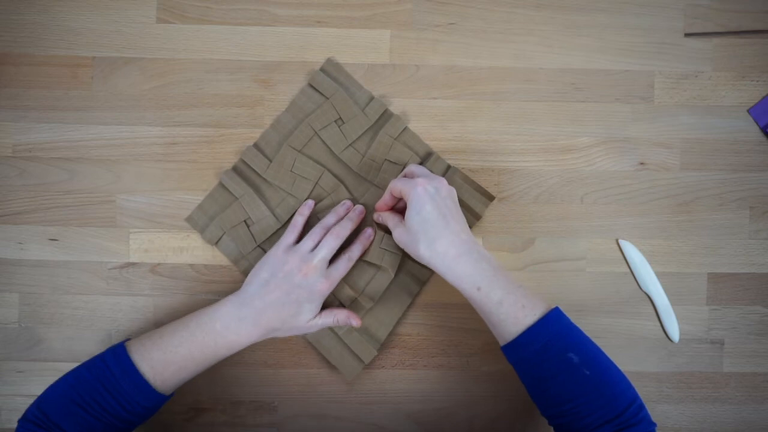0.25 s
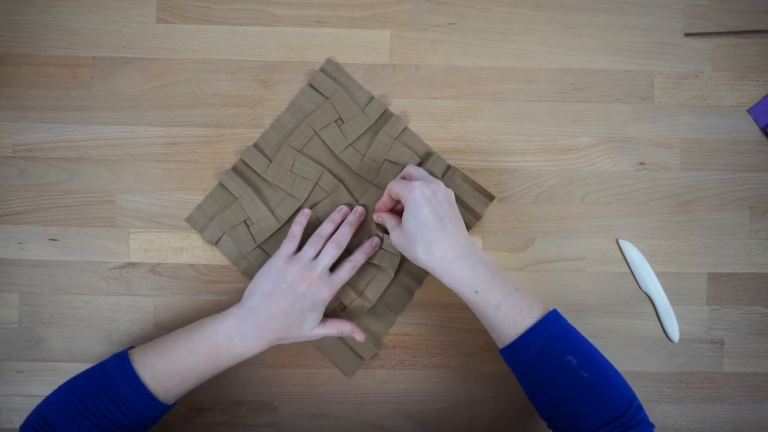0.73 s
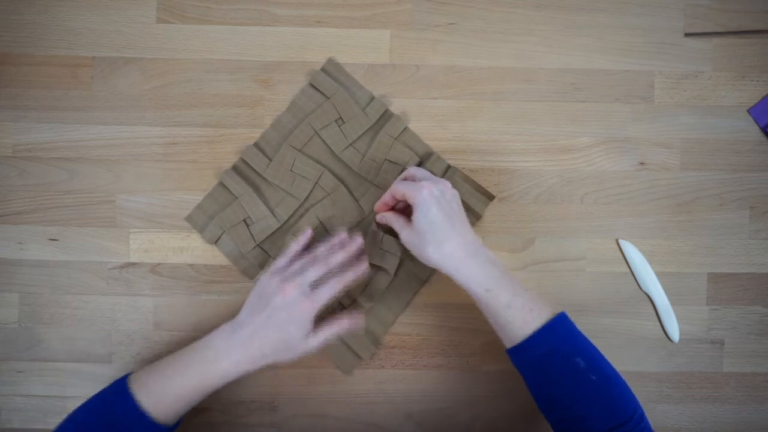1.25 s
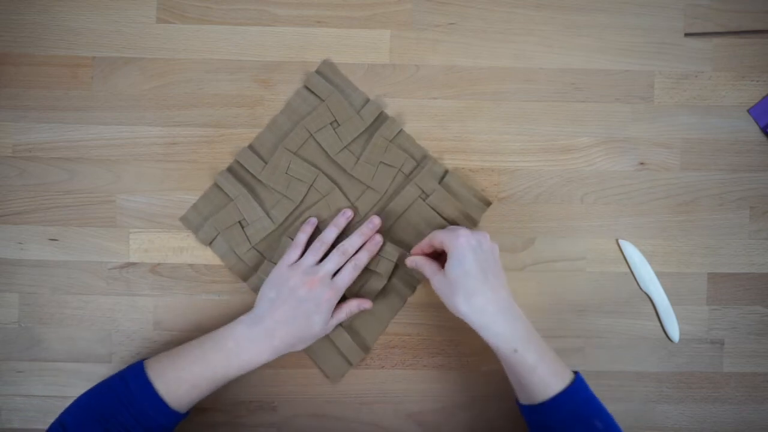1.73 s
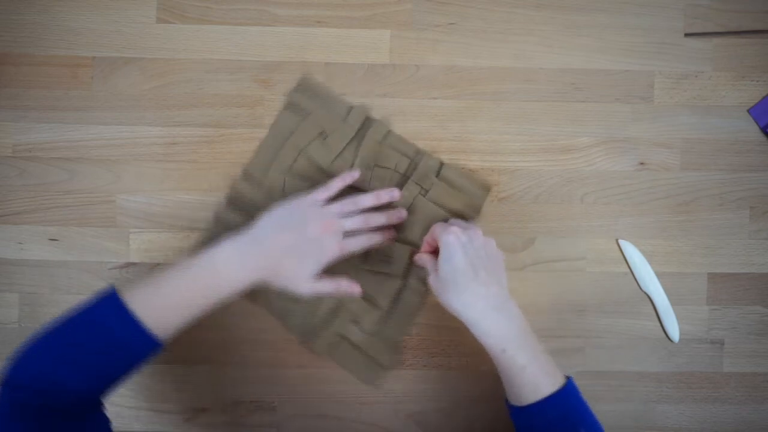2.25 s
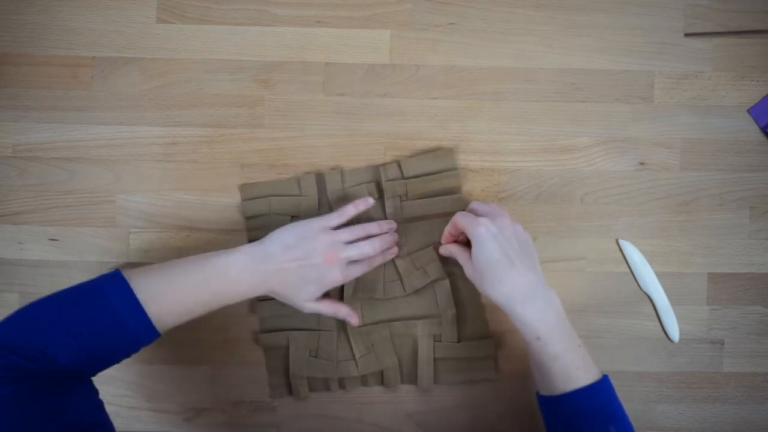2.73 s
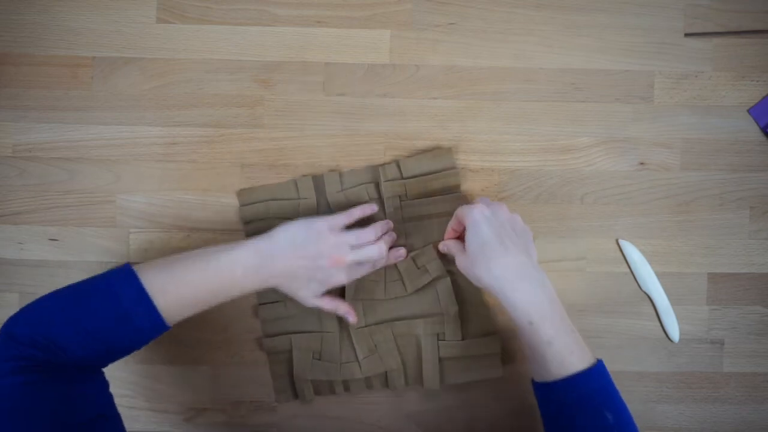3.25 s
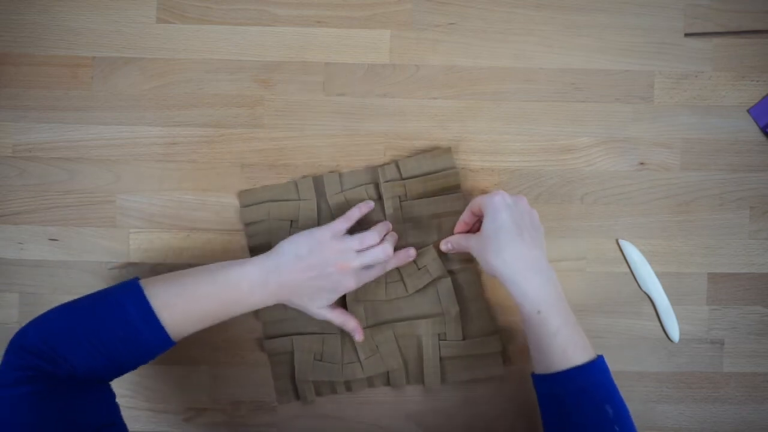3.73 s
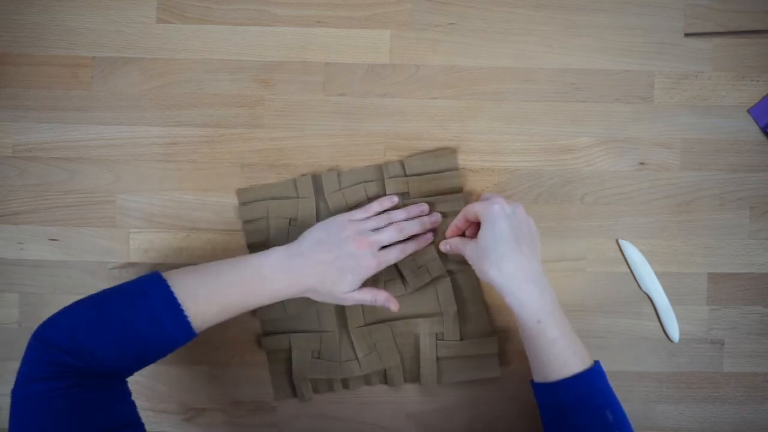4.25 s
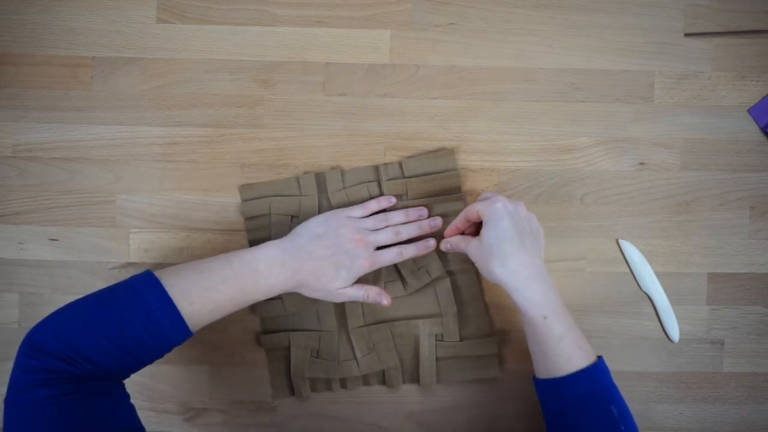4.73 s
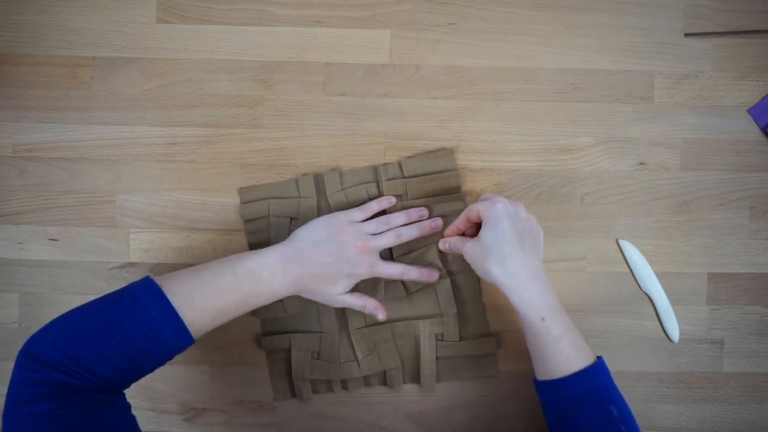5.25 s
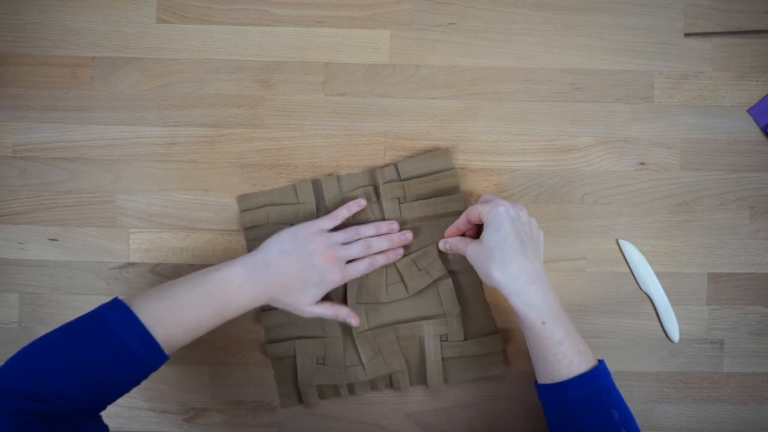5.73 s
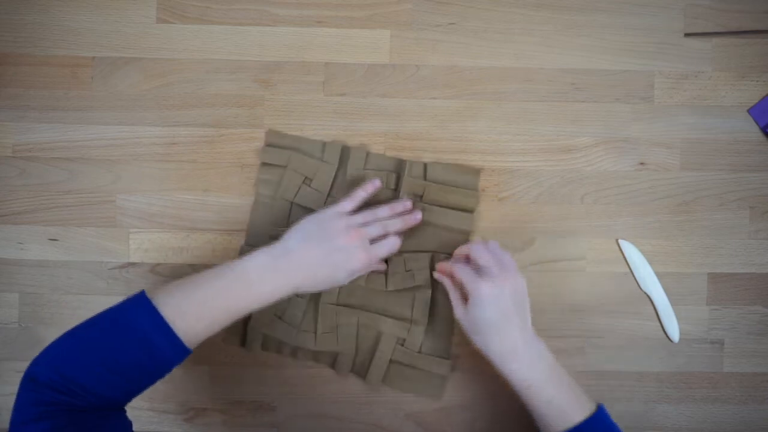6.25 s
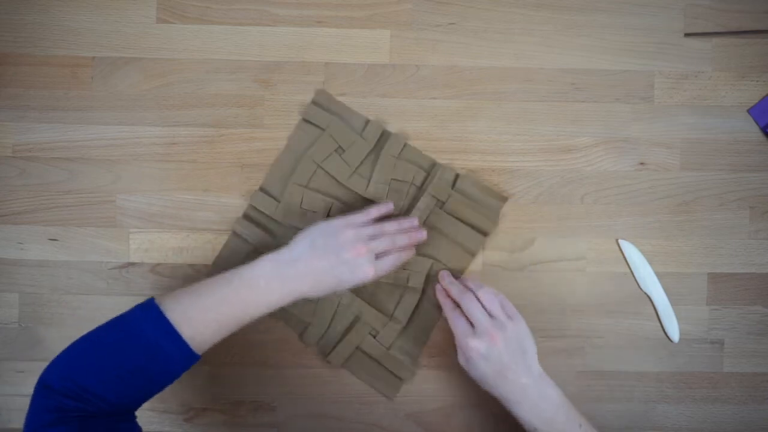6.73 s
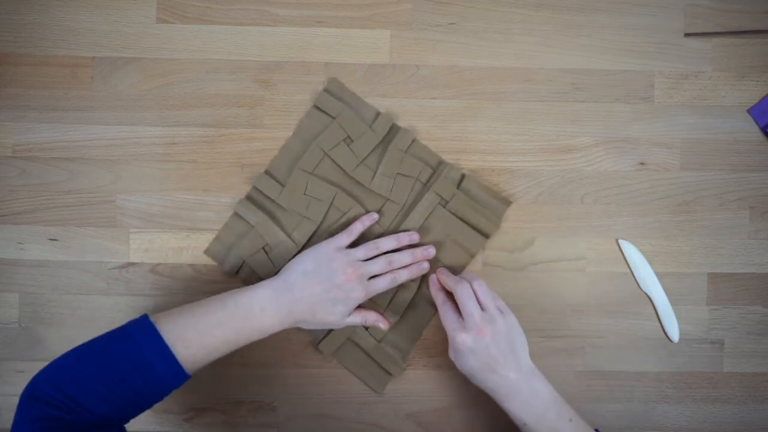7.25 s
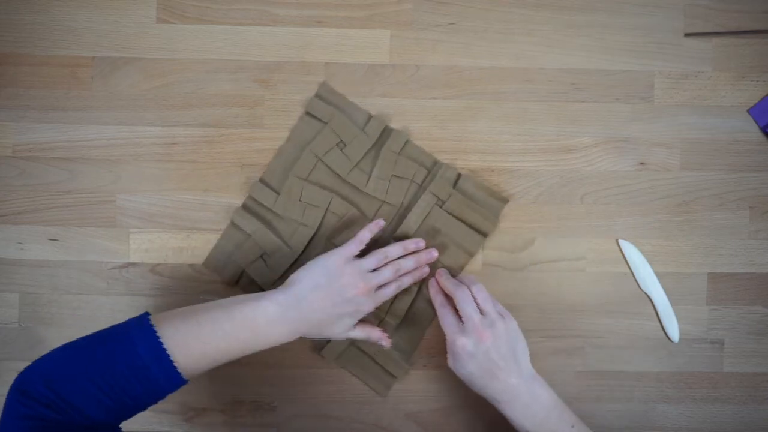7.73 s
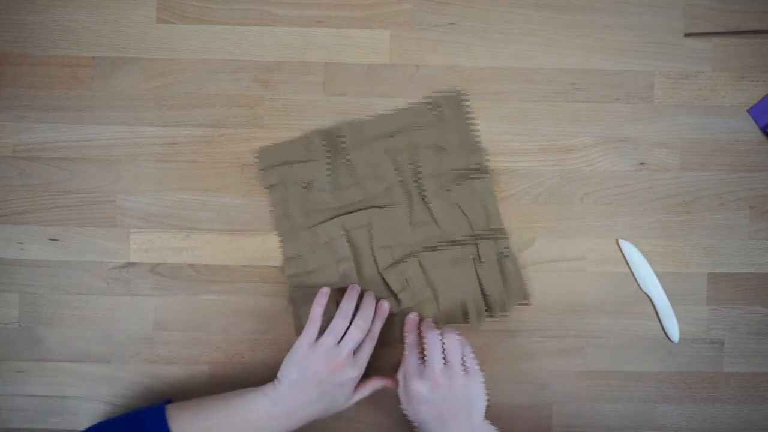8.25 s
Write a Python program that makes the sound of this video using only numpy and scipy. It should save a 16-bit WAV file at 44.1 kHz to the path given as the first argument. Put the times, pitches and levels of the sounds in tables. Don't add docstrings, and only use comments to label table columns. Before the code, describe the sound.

Close overhead stereo sound of fingers handling stiff, pleated paper on a wooden table in a small quiet room, with faint low ventilation hum and soft hiss throughout. Light rubbing begins, then prominent dry crease pops at about 0.57, 0.77, 0.94, 1.14 and 1.29 seconds, some with a tiny papery ring. Short strokes and soft fingertip touches continue from 1.4 to 2.5. Around 2.7 to 3.2 the sheet is shifted with strong, bright rustling scrapes. From 3.3 to 5.5 it is quieter: faint slides, dull ticks, little pops, a brisker stroke near 4.4 and a bright click at 4.87. Small rubs and clicks come near 5.8 to 6.0. The loudest swishes sweep through 6.4 to 6.9, a sharp nail click lands at 7.02, and another big push at 7.3 leads to a stroke near 7.6. Softer rubbing ends with a crisp pop at 8.18 and a snap near 8.39.

```python
import sys
import numpy as np
from scipy import signal
from scipy.fft import rfft, irfft, next_fast_len
from scipy.io import wavfile
from scipy.ndimage import uniform_filter1d, map_coordinates

SR = 44100
rng = np.random.default_rng(int(sys.argv[2]) if len(sys.argv) > 2 else 0)


def invert_db(x):
    u = np.asarray(x, float) / 20
    return 10 ** u


def transcribe(signal):
    frames = np.atleast_2d(signal).T
    limited = np.clip(frames, -1, 1)
    pcm = np.round(limited * 32767).astype(np.int16)
    wavfile.write(sys.argv[1], SR, pcm)


N = 374409


def unit(x):
    return x / np.sqrt(np.mean(x ** 2) + 1e-20)


def along(points, hz):
    f, v = np.transpose(points)
    return np.interp(np.log(hz + 1), np.log(f + 1), v)


def wobble(knots_per_s):
    knots = rng.standard_normal(int(N * knots_per_s / SR) + 4)
    return map_coordinates(knots, [np.arange(N) * knots_per_s / SR])


def filtered(x, response):
    n = x.shape[-1]
    m = next_fast_len(n + 8192)
    return irfft(rfft(x, m) * response(np.fft.rfftfreq(m, 1 / SR)), m)[..., :n]


def peak(f, hz, width_hz):
    return 1j * f * width_hz / (hz * hz - f * f + 1j * f * width_hz)


def spread(pair, alike):
    turn = lambda hz: np.arccos(np.clip(along(alike, hz), -1, 1)) / 2
    mid, side = filtered(pair, lambda hz: np.array([np.cos(turn(hz)), np.sin(turn(hz))]))
    return np.array([mid + side, mid - side])


# frequency in Hz, width in Hz, level in dB.
DUCT_MODES = [(38.5, 8.8, 2.5), (76.4, 13.3, 0.9), (119.2, 21.5, -3), (165, 23, -4.5), (243, 20.3, -6),
              (295, 4.4, -18), (376, 50, -12), (453.5, 15, -14), (681, 19, -11)]
# frequency in Hz, density in dB per Hz.
HISS_SPECTRUM = [(130, -45), (210, -14), (300, -7), (400, -5), (660, -10), (1000, -14), (1400, -19),
                 (2200, -27), (4000, -33), (8000, -38), (16000, -43)]
# frequency in Hz, left-right likeness from -1 to 1.
HUM_LIKENESS = [(60, 1), (180, 0.87), (550, 0.6), (1650, -0.2), (4970, -1), (15000, -5)]


def hum():
    ducts = lambda f: sum((-1) ** k * invert_db(db) * peak(f, hz, w) for k, (hz, w, db) in enumerate(DUCT_MODES))
    low_cut = lambda f: f ** 2 / (f ** 2 + 30 ** 2)
    rumble = unit(filtered(rng.standard_normal((2, N)), lambda f: ducts(f) * low_cut(f)))
    hiss = unit(filtered(rng.standard_normal((2, N)), lambda hz: invert_db(along(HISS_SPECTRUM, hz))))
    rumble_db = -51 + .6 * wobble(4)
    hiss_db = -52.5 + wobble(3.38) / 2
    return spread(invert_db(rumble_db) * rumble + invert_db(hiss_db) * hiss, HUM_LIKENESS)


# peak in seconds, length in seconds, sheet level in dB, hiss over the sheet in dB.
SWIPES = [(0.004, .07, -37, -14), (0.056, 0.18, -39, -3), (0.3, 0.6, -51.5, -11), (0.62, 0.45, -46, -16),
          (1.443, 0.26, -37.5, -7), (2.31, .4, -37.5, -6.5), (2.9, .2, -26, -4.5), (3.173, 0.19, -38.5, -6),
          (3.248, .08, -39.5, -2), (3.36, 0.31, -48.5, -2), (3.527, .15, -51.5, -9),
          (3.612, 0.12, -55, 2.5), (3.707, 0.068, -47, -6), (4.15, 0.43, -44.5, -4),
          (4.42, 0.11, -34.5, -3), (4.37, 0.23, -40.5, -7.5), (4.55, 0.39, -40, -0.5),
          (5.1, 0.54, -44.5, -11), (5.223, 0.11, -34, -3), (5.97, 0.11, -50, 4), (6.54, 0.12, -48, 7),
          (6.66, 0.23, -24, -4), (6.76, 0.2, -24.5, -8.5), (6.91, 0.19, -38.5, -0.5),
          (7.03, 0.34, -44.5, 2.5), (7.17, 0.26, -42, -2), (7.632, 0.21, -29.5, -7)]
PUSHES = [
    (1.235, 0.26, -39, -18),
    (1.664, 0.35, -35.5, -8),
    (2.68, 0.38, -38.5, -9),
    (3.075, .26, -22, -3),
    (6.41, 0.35, -37, -10),
    (7.28, 0.35, -23.5, -7),
    (7.483, 0.24, -43, -3.5),
    (7.842, .6, -43.5, -14),
    (8.246, 0.24, -37.5, -13),
]
DRAGS = [(0.833, 0.94, -44, -8), (1.32, 0.44, -45, -26), (2.06, 0.4, -42.5, -11), (3.821, .25, -40, -10),
         (3.971, 0.25, -41.5, -4.5), (4.275, 0.1, -43.5, -1.5), (4.745, 0.16, -41, -22),
         (4.9, 0.28, -39.5, 1.5), (5.31, 0.35, -51.5, -9), (5.81, 0.34, -34, -4), (8.371, 0.62, -43, -9.5)]
SLIDES = [(0.92, 0.25, -51, -6), (1.21, 0.072, -46, -2), (1.965, 0.14, -38, -5.5), (2.3, 0.23, -40.5, -5),
          (4.75, 0.075, -41, 0.5), (5.725, .06, -56, -20), (5.775, 0.034, -33.5, -0.5),
          (5.82, 0.045, -35, -3), (4.84, 0.084, -42, 1), (6.225, 0.087, -47, -9), (6.3, 0.15, -44.5, -1),
          (6.34, 0.046, -39.5, -5), (4.455, 0.035, -37, -2.5), (7.22, .24, -39, -2), (7.405, .07, -43, -5),
          (7.61, .1, -36, -8), (4.8, .07, -46, -9), (2.85, .12, -31, -8), (3.03, .12, -27, -4),
          (2.735, .08, -46, -5), (1.59, .14, -39.5, -6)]


def strokes():
    edge_db, hiss_steeper = 22.5, 1.12
    round_top, flat_top = 1.367, 5.2
    rest_sheet_db, rest_hiss_db = -60, -68
    kinds = [(SWIPES, .48, round_top), (PUSHES, .73, round_top), (DRAGS, .35, round_top), (SLIDES, .49, flat_top)]
    t = np.arange(0, N / SR + .004, .002)
    power = invert_db(2 * np.array([[rest_sheet_db], [rest_hiss_db]]))
    for table, rise, shape in kinds:
        s, length_s, db, hiss_db = np.transpose(table)[:, :, None]
        side_s = length_s * np.where(t < s, rise, 1 - rise)
        loss_db = edge_db * (np.abs(t - s) / side_s) ** shape
        levels_db = [db - loss_db, db + hiss_db - hiss_steeper * loss_db]
        power = power + (invert_db(levels_db) ** 2).sum(axis=1)
    return [np.interp(np.arange(N) / SR, t, np.sqrt(p)) for p in power]


def slips(spectrum, scatter_db, patchy_db):
    size = invert_db(scatter_db * np.clip(rng.standard_normal(N), -2, 2))
    z = signal.stft(size * rng.standard_normal((2, N)), nperseg=256)[2]
    field = uniform_filter1d(rng.standard_normal(z.shape[1:]), 4, 0)
    field = uniform_filter1d(field, 8, 1)
    pair = signal.istft(z * invert_db(patchy_db * unit(field)), nperseg=256)[1][:, :N]
    return unit(filtered(pair, lambda hz: invert_db(along(spectrum, hz))))


# frequency in Hz, density in dB per Hz.
SHEET_SPECTRUM = [(250, -64), (500, -41), (700, -9), (1150, -3.5), (2200, 1), (3900, -2.5), (5500, -10),
                  (9000, -15.5), (13000, -56)]
SKIN_SPECTRUM = [(1500, -62), (3000, -1.5), (4500, 1), (7100, -4.5), (9300, -4), (10600, -5.5),
                 (12500, -7.5), (15500, -6), (16200, -49)]


def rubbing():
    shake, slide = strokes()
    grip_db = .9 * wobble(25) + .7 * wobble(90)
    sheet = shake * invert_db(grip_db - 2.38) * slips(SHEET_SPECTRUM, scatter_db=5.0, patchy_db=0.75)
    hiss = slide * invert_db(grip_db + 0.57) * slips(SKIN_SPECTRUM, scatter_db=1.0, patchy_db=1.5)
    return sheet + hiss


def evened(x):
    z = rfft(x)
    return irfft(z / (np.abs(z) + 1e-9), x.shape[-1])


# frequency in Hz, width in Hz, gain in dB.
SHEET_MODES = [(700, 1030, 8.5), (1546, 1400, 0), (3010, 3480, 4.5), (9000, 15000, 3)]


def blows(table, rise):
    out, t = np.zeros((2, N + 2048)), np.arange(2048) / SR
    rattles = rng.standard_normal((len(table), 2, 2048))
    for (s, db, thump_db, snap_db, crack_db, ms), rattle in zip(table, rattles):
        u = t / (np.clip(ms, .3, 9) / 1000)
        swell = (1 - np.exp(-(u + 0.006) / rise)) * np.exp(-u)
        force = evened(rattle * swell) * np.exp(-u / 2)
        pop = 0
        for k, ((hz, width_hz, gain_db), part_db) in enumerate(zip(SHEET_MODES, (thump_db, 0, snap_db, crack_db))):
            kick = force * np.exp(-u * hz / 7000)
            part = filtered(kick, lambda f: (-1) ** k * peak(f, hz, width_hz) ** 3)
            pop = pop + invert_db(gain_db + part_db) * part / np.abs(part[0]).max()
        out[:, round((s - .0004) * SR):][:, :2048] += invert_db(db) * pop
    return out[:, :N]


# start in seconds, fold peak in dB, snap in dB, crack in dB, length in ms.
FLICKS = [
    (0.447, -50, 3, -6, 1.5),
    (2.66, -34, 1, -4, 3),
    (3.5219, -38, -18, -11, 4),
    (3.6976, -42, -5, -10.5, 5.6),
    (4.8745, -29, 11, 16.5, 1.6),
    (5.9965, -32, 14, -9, 1.4),
    (7.0224, -22, 7, 10, 1.23),
    (8.388, -29.5, 15, 3, 0.82),
]


def flicks():
    thump_db = -15
    return blows([(s, db, thump_db, snap, crack, ms) for s, db, snap, crack, ms in FLICKS], rise=.02)


# start in seconds, fold peak in dB, thump in dB, snap in dB, length in ms.
CREASES = [(0.5402, -52.5, 16.5, 13, 4.5), (0.5721, -11.5, -39, -13, 5.6), (0.62, -20, -44, -2, 2.3),
           (0.7665, -11.5, -29, -13, 1.94), (0.9376, -20.5, -34, -10, 1.2), (1.1379, -18.5, -21.5, -1, 5.2),
           (1.177, -23, -16.5, 4, 1.6), (1.287, -16, -14, 1.5, 1.5), (1.9976, -31, -20, -21, 4),
           (3.8642, -29, -26, -25, 4.3), (4.0641, -24.5, -14.5, -13, 2.8), (4.2695, -46.5, -12, 14, 4.9),
           (4.5765, -39.5, 3.5, 11, 3.5), (4.7245, -38, -14, -1.1, 2.1), (5.7464, -48, -1.1, -2.1, 3.5),
           (5.7578, -27, -4, 10.5, 4), (8.0737, -31, -22, -13, 3.5), (8.1804, -15.5, -20.5, -4, 5.3)]
TOUCHES = [(1.6603, -34.5, -9, 8, 4.6), (1.9836, -29.5, -19, -21, 8.9), (2.0734, -33.5, -25, -5, 6),
           (2.2145, -35.5, -2.5, 6.5, 3.9), (2.373, -32.5, -10.1, 0, 4.8), (2.705, -29, -14, -3, 3.2),
           (2.981, -22.5, -17, -3, 3), (3.1682, -34, -25, 7, 2), (3.2427, -38, -26, 9, 2.6),
           (3.4944, -58, 8, 20.5, 3.3), (4.2992, -55, 16.5, 2.1, 5.1), (4.342, -41.5, 6, 9, 1.7),
           (4.8322, -40.5, -5, 13, 1.7), (8.3534, -36, -16, 1, 2.7), (8.3723, -28, -10, -5, 2.5)]


def pops():
    def cracked(rows, crack_db):
        return [(s, db, thump, snap, crack_db + snap, ms) for s, db, thump, snap, ms in rows]

    creases = blows(cracked(CREASES, crack_db=-22), rise=.02)
    touches = blows(cracked(TOUCHES, crack_db=-8), rise=3)
    return creases + invert_db(-5.0) * touches


# start in seconds, pitch in Hz, level in dB, t60 in seconds.
FLAP_RINGS = [(.572, 2965, -16.5, 0.035), (.573, 1504, -24, 0.062), (0.621, 1490, -26, .06),
              (0.765, 1570, -19, .06), (0.939, 1036, -35.5, 0.18), (1.139, 1970, -27, 0.14),
              (1.139, 772, -31.5, 0.14), (1.178, 2850, -27, 0.038), (1.286, 1021, -20, 0.11),
              (1.285, 2945, -16, 0.038), (3.867, 990, -34.5, 0.055), (4.067, 1725, -29, 0.081),
              (4.27, 2900, -37, 0.091), (4.578, 536, -39, 0.085), (5.76, 700, -42, 0.098),
              (8.075, 1150, -37, 0.11), (8.074, 2990, -34.5, 0.067), (8.181, 1450, -23.5, 0.069),
              (8.183, 2460, -12.5, 0.027), (8.388, 2680, -27, .04), (8.181, 3900, -27, .03),
              (8.181, 5100, -29, .03), (0.766, 2950, -26, .04), (0.574, 1100, -26, .12),
              (1.287, 1550, -24, .08), (8.388, 4600, -27, .025)]


def flaps():
    out, t = np.zeros(N + 8192), np.arange(8192) / SR
    detunes = rng.uniform(.02, .04, (len(FLAP_RINGS), 1))
    for (s, hz, db, t60_s), detune in zip(FLAP_RINGS, detunes):
        pair = np.sin(2 * np.pi * hz * t) + 0.29 * np.sin(2 * np.pi * hz * (1 + detune) * t)
        onset = 1 - np.exp(-t / 0.0003)
        out[round(s * SR):][:8192] += invert_db(db - 60 * t / t60_s) * onset * pair
    return out[:N] * np.array([[1], [-1]])


# frequency in Hz, width in Hz, lift in dB.
GAP_MODES = [(783, 30, 4), (1034, 35, 7), (1279, 25, 4), (1430, 25, 5), (1512, 35, 4), (1963, 40, 5),
             (2278, 50, 3), (2980, 50, 5)]


def gap(x):
    lifts = lambda f: sum((invert_db(db) - 1) * peak(f, hz, w) for hz, w, db in GAP_MODES)
    return filtered(x, lambda f: 0.9 + 0.46 * lifts(f))


def bounced(x, share):
    bounce_s = .00204
    return filtered(x, lambda f: 1 + share * np.exp(-2j * np.pi * f * bounce_s))


# frequency in Hz, t60 in seconds.
WALL_T60 = [(300, 0.54), (1500, 0.5), (4000, 0.23), (12000, 0.08)]


def room(x, count=6):
    turn_s, delay_s = .07, .0035
    place, out = (np.arange(N) / SR / turn_s) % count, 0
    for k in range(count):
        hz, t, z = signal.stft(rng.standard_normal((2, SR // 2)), SR, nperseg=256)
        early = 1 + 1.22 * np.exp(-t / 0.024)
        fade = invert_db(-60 * t / along(WALL_T60, hz)[:, None]) * early
        tail = signal.istft(z * fade, SR, nperseg=256)[1]
        tail = np.pad(tail, ((0, 0), (round(delay_s * SR), 0)))
        away = np.abs(place - k)
        away = np.minimum(away, count - away)
        share = np.sin(np.pi / 2 * np.clip(1 - away, 0, 1))
        out = out + signal.oaconvolve(x * share, tail / np.linalg.norm(tail[0]), axes=1)[:, :N]
    return out


# frequency in Hz, left-right likeness from -1 to 1.
PAPER_LIKENESS = [(300, 1), (1400, 0.76), (3000, 0.61), (7000, 0.32), (15000, 0.56)]
# frequency in Hz, left minus right in dB.
MIC_LEAN = [(300, 0.5), (2400, -1.5), (4400, 1), (15000, 1)]


def scene():
    rubs, creases, nails = gap(rubbing()), gap(pops()), gap(flicks())
    far = room(invert_db(-11.0) * rubs + invert_db(-1.5) * creases + invert_db(-4) * nails)
    near = bounced(rubs, share=.15) + bounced(creases + nails, share=.6)
    paper = spread(near + far, PAPER_LIKENESS)
    leaning = filtered(paper, lambda hz: invert_db(np.outer([.5, -.5], along(MIC_LEAN, hz))))
    return leaning + hum() + spread(flaps(), [(300, .98), (3000, 0.95)])


def roll_off(x):
    return signal.sosfilt(signal.butter(12, 16990, fs=SR, output="sos"), x)


def record(dry):
    top_hz = 16800
    capsule = lambda hz: (1 + 0.9 * peak(hz, 12830, 3200)) * (hz < top_hz)
    return roll_off(filtered(dry, capsule))


dry = scene()
out = record(dry)
transcribe(out)
```